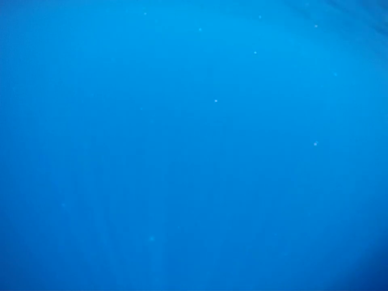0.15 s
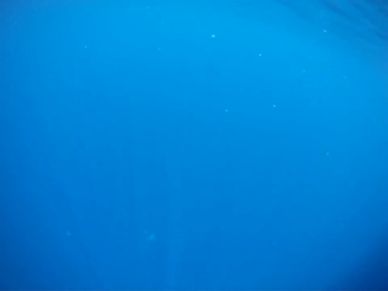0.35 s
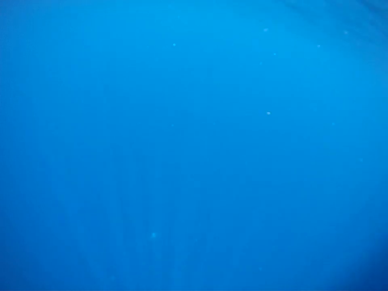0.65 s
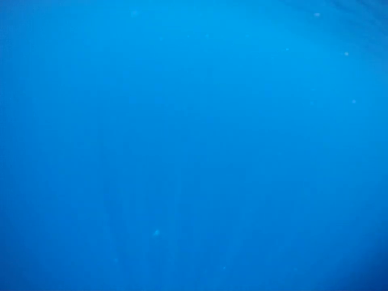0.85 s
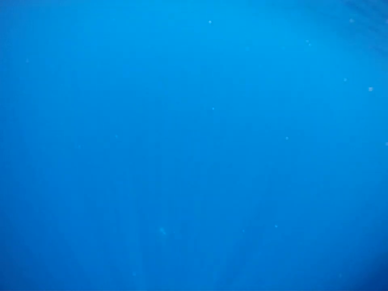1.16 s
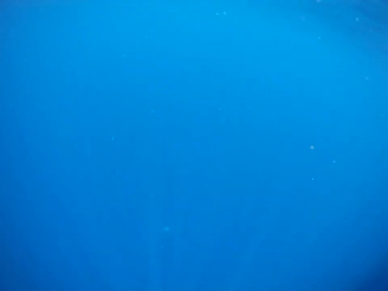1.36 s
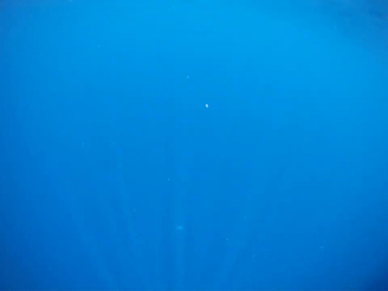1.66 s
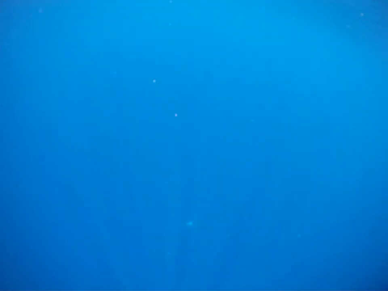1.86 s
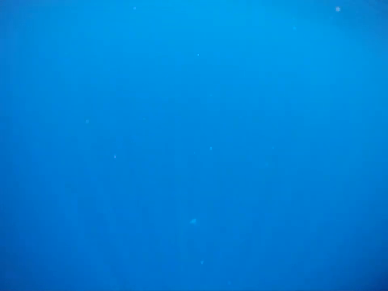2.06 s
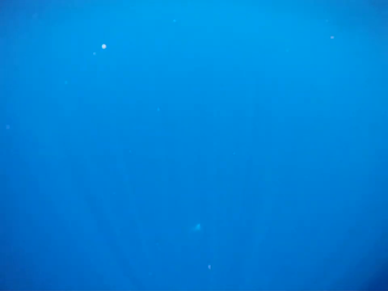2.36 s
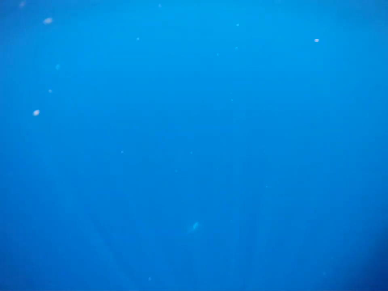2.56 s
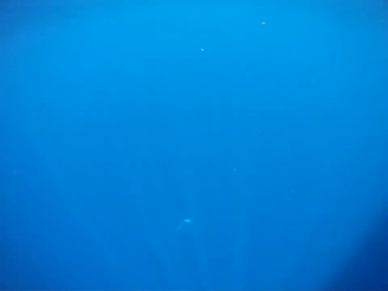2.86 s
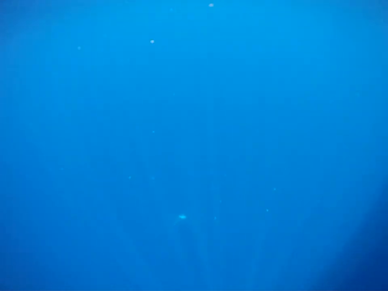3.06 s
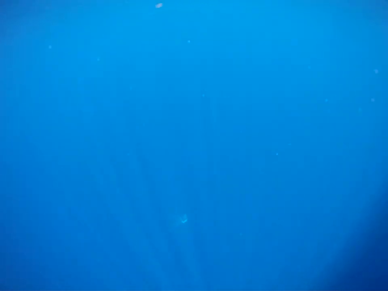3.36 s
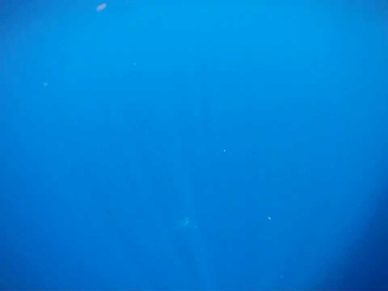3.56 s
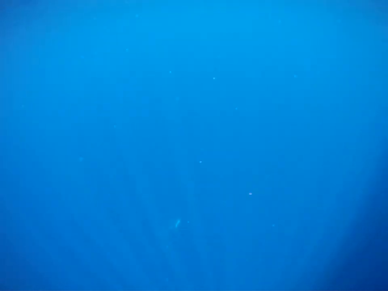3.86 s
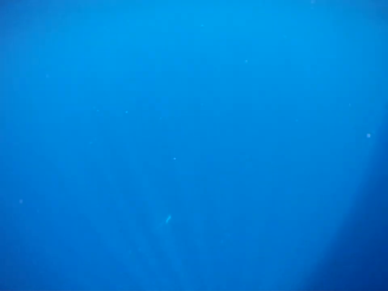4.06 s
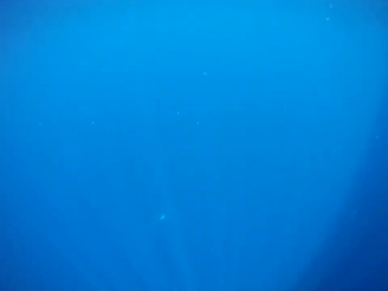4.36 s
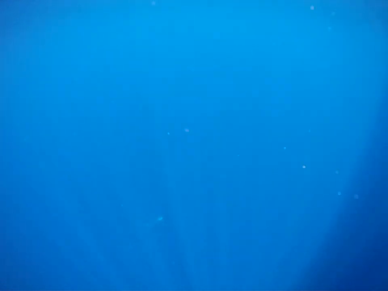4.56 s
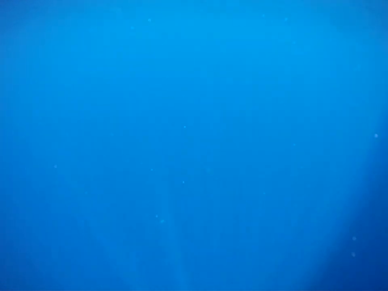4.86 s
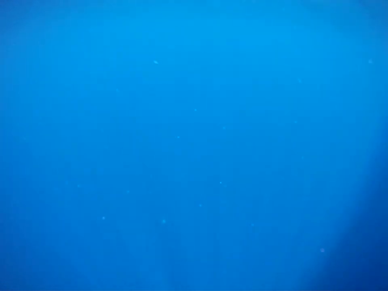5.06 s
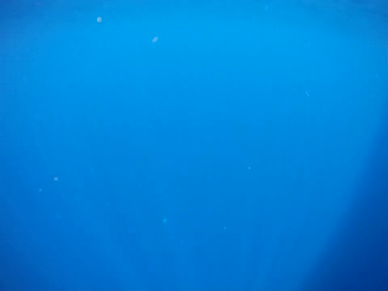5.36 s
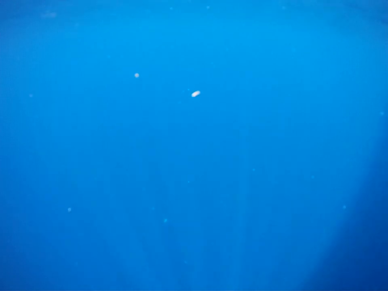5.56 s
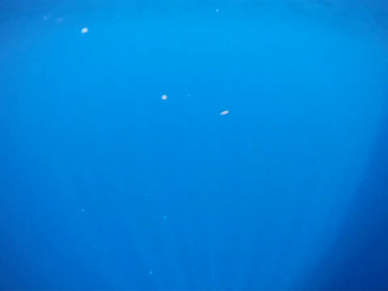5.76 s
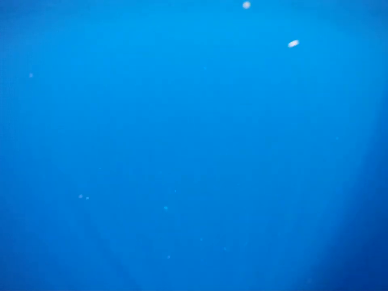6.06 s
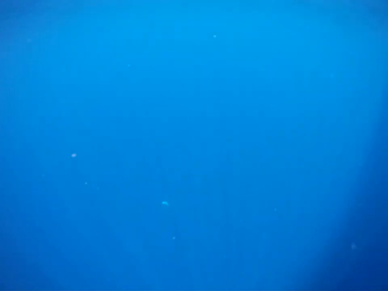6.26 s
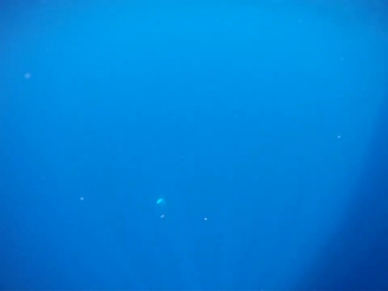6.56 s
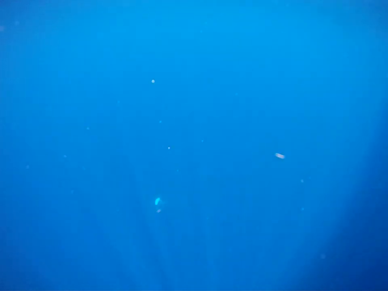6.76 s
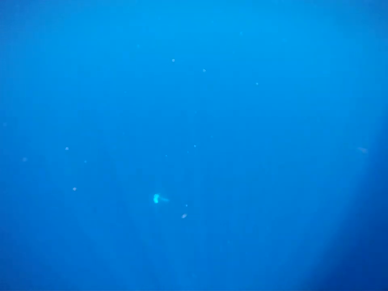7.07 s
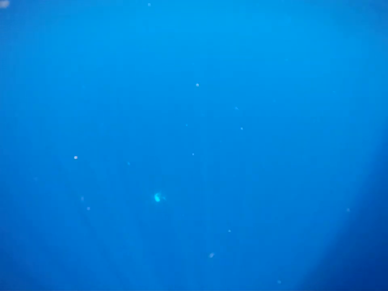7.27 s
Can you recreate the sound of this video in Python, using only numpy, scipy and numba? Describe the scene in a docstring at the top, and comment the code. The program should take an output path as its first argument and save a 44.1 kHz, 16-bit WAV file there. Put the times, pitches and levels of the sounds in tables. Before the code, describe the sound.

Muffled underwater churn and hum of a boat motor, with low buffeting and five sharp knocks on a towed camera housing.

```python
"""A camera in a sealed housing is towed under water behind a motor boat.
From the start, propeller wash rings the housing, the motor hums, flow buffets, a loose part ticks.
From 2 to 4 s, five jerks of the tow line knock the housing; the line's fitting clinks after the first.
The recorder's limiter ducks after each knock; its coarse sample-and-hold adds a glassy fizz throughout.
The motor then speeds up, peaking at 6.6 s, and the wash sloshes twice just after 7 s."""
import sys
import numpy as np
from scipy import signal
from scipy.fft import rfft, irfft
from scipy.io import wavfile
from scipy.ndimage import uniform_filter1d
from numba import njit

SR = 44100
rng = np.random.default_rng(int(sys.argv[2]) if len(sys.argv) > 2 else 0)


def pcm_store(signal):
    """Save signal as 16-bit PCM."""
    levels = np.round(np.clip(np.atleast_2d(signal), -1, 1) * 32767)
    wavfile.write(sys.argv[1], SR, levels.astype(np.int16).T)


N = 327663
TIME_S = np.arange(N) / SR
FREQS_HZ = np.fft.rfftfreq(N, 1 / SR)


def from_db(db):
    """Decibels to gain."""
    return 10 ** (np.asarray(db) / 20)


def unit_rms(x):
    """Scale to rms 1."""
    return x / np.sqrt(np.mean(x ** 2) + 1e-20)


def curves(table):
    """One per-sample curve for each column after time_s."""
    time_s, *columns = np.transpose(table)
    return [np.interp(TIME_S, time_s, column) for column in columns]


def swell(peak_s, width_s):
    """Gaussian bump of height 1."""
    return np.exp(-(2 * (TIME_S - peak_s) / width_s) ** 2)


def spectrum(points):
    """Gain per bin from (freq_hz, level_db) points."""
    freq_hz, level_db = np.transpose(points)
    return from_db(np.interp(np.log(FREQS_HZ + 1), np.log(freq_hz), level_db))


def noise(gain):
    """Noise of rms 1 with the given spectrum."""
    return unit_rms(irfft(rfft(rng.standard_normal(N)) * gain, N))


def drift(hz):
    """Random wander of rms 1, up to about hz."""
    return noise(np.exp(-(FREQS_HZ / hz) ** 2))


def steadied(x, window_s):
    """Even out the slow swells of a noise."""
    size = int(window_s * SR)
    power = uniform_filter1d(uniform_filter1d(x ** 2, size), size)
    return x / np.sqrt(power + 1e-4)


def add(mix, start_s, sound):
    """Mix a sound in at start_s."""
    part = mix[round(start_s * SR):][:len(sound)]
    part += sound[:len(part)]


def ring(modes):
    """Struck modes: soft rise, exponential decay."""
    t = TIME_S[:SR]
    out = np.zeros(SR)
    for pitch_hz, level_db, t60_s, rise_s in modes:
        envelope = from_db(level_db - 60 * t / t60_s) * (1 - np.exp(-t / rise_s)) ** 2
        out += envelope * np.sin(2 * np.pi * pitch_hz * t)
    return out


def taps(blows, modes):
    """Light blows on one small part."""
    out, sound = np.zeros(N), ring(modes)
    for start_s, level_db in blows:
        add(out, start_s, -from_db(level_db) * sound)
    return out


# time_s, level_db
CHURN = [(0.0, -38.5), (1.7, -37.5), (2.7, -36.5), (3.4, -39.5), (5.1, -39.5), (6.15, -42), (6.7, -39.5),
         (7.42, -38.5)]
# peak_s, boost_db, width_s
WASH_SLOSHES = [(7.19, 5.5, 0.088), (7.343, 3, .06)]
# freq_hz, level_db
WASH_SPECTRUM = [(40, -20), (150, -7), (250, -15), (450, -9), (800, -12.5), (1100, -33), (2400, -33),
                 (3100, -37), (4100, -41), (4600, -44.5), (5400, -45.5), (6000, -53.5)]
# centre_hz, width_hz, level_db
HOUSING_RESONANCES = [(339, 39, -5.5), (367, 120, -12.5), (534.3, 100, 1), (674.5, 62, -2), (807, 45, -13),
                      (1000, 67, -15), (1216, 71, -10), (1358, 134, -14.5), (1652, 158, -17),
                      (2020, 206, -18.5), (2320, 200, -14), (2800, 280, -29), (3420, 660, -38.5)]


def wash(shaft_turns, throb_depth=0.095, flutter_db=-0.7, surge_db=1.0, trim_db=-0.14, split_hz=1850):
    """Propeller noise rings the housing and throbs once a shaft turn; fine bubbles hiss above it."""
    churn_db = curves(CHURN)[0]
    churn_db += sum(boost_db * swell(peak_s, width_s) for peak_s, boost_db, width_s in WASH_SLOSHES)
    bubbles_db = -51.5 + 0.5 * (churn_db - churn_db.mean())
    power = spectrum(WASH_SPECTRUM) ** 2
    for centre_hz, width_hz, level_db in HOUSING_RESONANCES:
        power += from_db(level_db) ** 2 / (1 + ((FREQS_HZ - centre_hz) / width_hz) ** 2) ** 4
    low_share = 1 / (1 + (FREQS_HZ / split_hz) ** 24)
    churn = from_db(churn_db + trim_db) * noise(np.sqrt(power * low_share))
    bubbles = from_db(bubbles_db) * noise(np.sqrt(power * (1 - low_share)))
    throb = 1 + throb_depth * np.cos(2 * np.pi * shaft_turns)
    waver = from_db(flutter_db * drift(hz=90) + surge_db * drift(hz=9.1))
    return (churn + bubbles) * throb * waver


def rattle(centre_hz=1270, width_hz=90, relative_db=-17.0, spurt_db=3.5):
    """One housing resonance chatters in uneven spurts as the wash churns."""
    churn_db, = curves(CHURN)
    spurts = unit_rms(from_db(spurt_db * np.minimum(drift(hz=25.2), 2)))
    band = noise(np.exp(-((FREQS_HZ - centre_hz) / width_hz) ** 2))
    return from_db(churn_db + relative_db) * spurts * band


# time_s, firing_hz
MOTOR_SPEED = [(0.0, 67.5), (0.5, 67.64), (1.15, 66.13), (1.52, 72.9), (1.75, 69.4), (1.95, 63.5),
               (2.4, 60.1), (3.4, 65.27), (4.2, 67.74), (4.5, 66.3), (5.0, 68.3), (5.22, 66.64),
               (6.2, 79.93), (6.6, 83), (7.0, 74.5), (7.42, 74.5)]


def firing_cycles():
    """Running count of the motor's firings, two per shaft turn."""
    firing_hz, = curves(MOTOR_SPEED)
    return np.cumsum(firing_hz) / SR


# time_s, second_harmonic_db, third_harmonic_db
MOTOR_HARMONICS = [(0.0, -50, -48.5), (1.7, -47, -48), (4.2, -46.5, -54), (4.8, -44, -55),
                   (5.25, -43.5, -54), (5.85, -56, -53.5), (6.2, -50, -48.5), (6.6, -37, -66),
                   (7.05, -42.5, -53), (7.42, -51, -67)]


def motor(firings, shaft_db=-46, first_db=-53, fourth_db=-58, fifth_db=-57, waver_db=2.5, roughness=0.17):
    """Shaft hum and firing harmonics, wavering and roughened by the wake."""
    second_db, third_db = curves(MOTOR_HARMONICS)
    levels_db = {0.5: shaft_db, 1: first_db, 2: second_db, 3: third_db, 4: fourth_db, 5: fifth_db}
    out = np.zeros(N)
    for order, level_db in levels_db.items():
        amplitude = np.sqrt(2) * from_db(level_db + waver_db * drift(hz=15.0))
        out += amplitude * np.sin(2 * np.pi * order * firings)
    return out * (1 + roughness * drift(hz=33.3))


# time_s, sway_db, buffet_db
FLOW_LEVELS = [(0.0, -40.5, -49), (.8, -42.5, -44.5), (1.85, -38.5, -42.5), (2.65, -23, -33.5),
               (3.6, -40, -39.5), (4.3, -42.5, -33.5), (5.5, -43, -34), (6.15, -48, -40.5),
               (6.55, -44.5, -35), (7.42, -39, -31.5)]
# peak_s, sway_boost_db, buffet_boost_db, width_s
FLOW_GUSTS = [(1.05, 11, 4.5, 0.23), (1.74, 7, 6.5, 0.11), (2.007, 11.5, 9.5, 0.12),
              (3.766, 15.5, 11.5, 0.067), (4.15, 15.5, 4.5, 0.2), (5.023, -6, 8, 0.06),
              (5.24, 13, -0.5, 0.15), (6.4, 14, 4, 0.11), (6.69, 13.5, 7, 0.23)]
# freq_hz, level_db
SWAY_SPECTRUM = [(8, -16), (18, -2), (28, 2), (40, -2), (52, -1), (64, -7), (90, -25), (200, -70)]
# freq_hz, level_db
BUFFET_SPECTRUM = [(35, -5.5), (62, -13), (84, 4), (106, 5.5), (125, -12.5), (165, -14.5), (220, -19.5),
                   (320, -74), (900, -71)]


def flow(uneven_sway_db=-1.35, uneven_buffet_db=3.0):
    """Eddies rock the housing and drum on it near its body resonance, harder in gusts."""
    sway_db, buffet_db = curves(FLOW_LEVELS)
    for peak_s, sway_boost_db, buffet_boost_db, width_s in FLOW_GUSTS:
        gust = swell(peak_s, width_s)
        sway_db += sway_boost_db * gust
        buffet_db += buffet_boost_db * gust
    eddies = drift(hz=8)
    sway_db += uneven_sway_db * eddies
    buffet_db += uneven_buffet_db * eddies
    sway = steadied(noise(spectrum(SWAY_SPECTRUM)), window_s=0.045)
    buffet = steadied(noise(spectrum(BUFFET_SPECTRUM)), window_s=0.04)
    return from_db(sway_db) * sway + from_db(buffet_db) * buffet


# peak_s, level_db, pitch_hz, width_s
EDDY_SHOVES = [(1.085, -26.5, 102, 0.035), (2.476, -13, 29.4, 0.058), (2.814, -6.5, 82.3, 0.043),
               (3.397, -15.5, 110.4, 0.068), (3.775, -31, 164, 0.055), (4.4, -31, 110, 1),
               (5.77, -18, 85.4, 0.038)]


def shoves():
    """Large eddies each swing the housing at one low pitch."""
    out = np.zeros(N)
    for peak_s, level_db, pitch_hz, width_s in EDDY_SHOVES:
        envelope = from_db(level_db) * swell(peak_s, width_s) ** 2
        out += envelope * np.sin(2 * np.pi * pitch_hz * (TIME_S - peak_s))
    return out


# pitch_hz, level_db, t60_s, rise_s
LOOSE_PART_MODES = [(1275, -2.5, 0.036, 0.002)]


def loose_part(first_s=0.008, period_s=0.184, level_db=-25, fade_db_per_s=2.0, uneven_db=1.4):
    """A loose part aboard ticks at an even pace and fades into the wash."""
    starts_s = np.arange(first_s, N / SR, period_s)
    levels_db = level_db - fade_db_per_s * starts_s + uneven_db * rng.standard_normal(len(starts_s))
    return taps(zip(starts_s, levels_db), LOOSE_PART_MODES)


# start_s, level_db
SPECK_HITS = [(2.789, -23), (7.168, -23.5)]
# pitch_hz, level_db, t60_s, rise_s
SPECK_MODES = [(2880, -1.5, 0.0093, 0.00053), (3130, -6, 0.0086, .0003)]


def specks():
    """Specks in the water tick on the shell."""
    return taps(SPECK_HITS, SPECK_MODES)


# start_s, level_db
FITTING_HITS = [(2.7878, -8.5), (2.8622, -5)]
# pitch_hz, level_db, t60_s, rise_s
FITTING_MODES = [(268, -5, .05, 0.002), (386, -6.5, 0.055, 0.00087), (506, 4.5, 0.034, 0.0014),
                 (605, -6, 0.039, 0.0044), (825, -6, 0.062, 0.0012), (1290, -33, 0.014, 0.0015)]


def clinks():
    """Light blows ring the tow line's fitting."""
    return taps(FITTING_HITS, FITTING_MODES)


# start_s, crack_db, lowpass_hz, thud_lag_s, thud_db
LINE_JERKS = [(2.0407, 24, 2930, 0.0030, 28.5), (2.9321, 15, 1570, 0.0031, 23.5),
              (3.1457, 6.5, 2487, .0038, 19.5), (3.6074, -1.5, 1400, 0.0036, 14.5),
              (3.9669, 3, 1000, .004, 17.5)]
# pitch_hz, level_db, t60_s, rise_s
SHELL_MODES = [(168.5, -3.5, 0.011, 0.0016), (544, 0, 0.032, .003), (593, 0, 0.022, 0.0026),
               (694.4, -2.5, .018, 0.0011), (954, -2.5, 0.0089, 0.00084), (1285, 4.5, 0.0052, 0.001),
               (1664, -13.5, 0.014, 0.00078), (2062, -11.5, 0.01, 0.00076), (3500, -35, 0.0012, 0.00015)]
# pitch_hz, level_db, t60_s, rise_s
BODY_MODES = [(142.7, 9, 0.029, .0058), (104.5, 10.5, .0406, 0.0094), (106.3, -17, 0.12, 0.0063),
              (85.4, -21, .25, 0.0072), (40.92, -25, 0.55, 0.024)]


def knocks(hollow_hz=330, hollow_q=1.4, hollow_share=0.7):
    """The line jerks: the shell cracks, then the body thuds, with a hollow between their pitches."""
    out = np.zeros(N)
    crack_spectrum, thud = rfft(ring(SHELL_MODES), N), ring(BODY_MODES)
    for start_s, crack_db, lowpass_hz, thud_lag_s, thud_db in LINE_JERKS:
        contact = 1 / (1 + 1j * FREQS_HZ / lowpass_hz) ** 2  # longer contact, duller crack
        crack = irfft(crack_spectrum * contact, N)[:SR]
        add(out, start_s, -from_db(crack_db) * crack)
        add(out, start_s + thud_lag_s, from_db(thud_db) * thud)
    hollow_band = signal.lfilter(*signal.iirpeak(hollow_hz, hollow_q, SR), out)
    return out - hollow_share * hollow_band


def scene():
    """Both microphones hear the same sound through the housing wall."""
    firings = firing_cycles()
    water = wash(shaft_turns=firings / 2) + rattle() + motor(firings) + flow() + shoves()
    sound = water + loose_part() + specks() + clinks() + knocks()
    return np.array([sound, sound])


@njit
def limiter(x, rate_hz, ceiling_db, attack_s=0.0023, recovery_db_per_s=98.0, step_db=0.4):
    """Gain falls fast above the ceiling, then creeps back, in steps that crackle."""
    out, cut_db = np.empty_like(x), 0.0
    for i in range(len(x)):
        stepped_db = step_db * np.floor(cut_db / step_db)
        out[i] = x[i] * 10 ** (-stepped_db / 20)
        over_db = 20 * np.log10(abs(out[i]) + 1e-9) - ceiling_db
        if over_db > 0:
            cut_db += over_db / (attack_s * rate_hz)
        else:
            cut_db = max(cut_db - recovery_db_per_s / rate_hz, 0.0)
    return out


def converter(sound, ceiling_db, rate_hz=12000, repeats=4):
    """Downsample, limit, clip, hold; holding mirrors the sound about rate_hz as fizz."""
    coarse = signal.resample_poly(sound, rate_hz, SR)
    limited = limiter(coarse, rate_hz, ceiling_db)
    held = np.repeat(np.clip(limited, -1, 1), repeats)
    return signal.resample_poly(held, SR, repeats * rate_hz)[:N]


def record(dry, ceiling_db=-12.5, right_headroom_db=1.4, lowpass_hz=15500):
    """One limiter and converter per channel, the right ducking less; then the band limit."""
    left = converter(dry[0], ceiling_db)
    right = converter(dry[1], ceiling_db + right_headroom_db)
    lowpass = signal.firwin(255, lowpass_hz, window=("kaiser", 9), fs=SR)
    return signal.oaconvolve(np.array([left, right]), lowpass[None], "same")


dry = scene()
out = record(dry)
pcm_store(out)
```